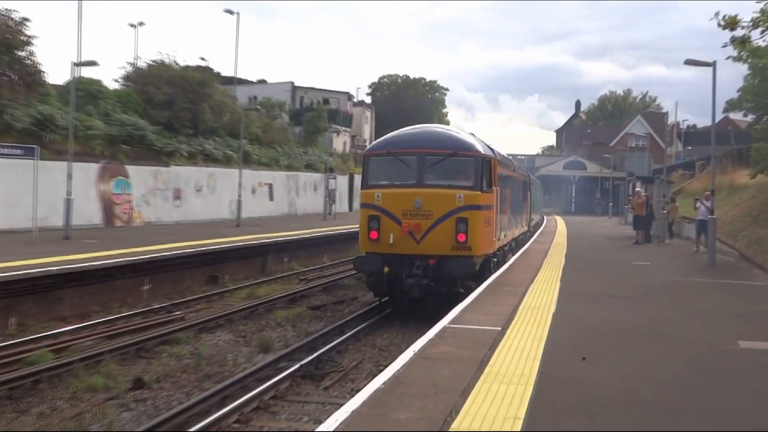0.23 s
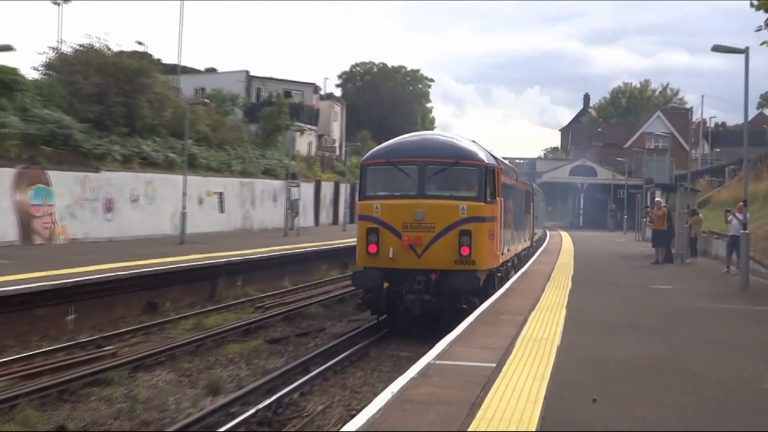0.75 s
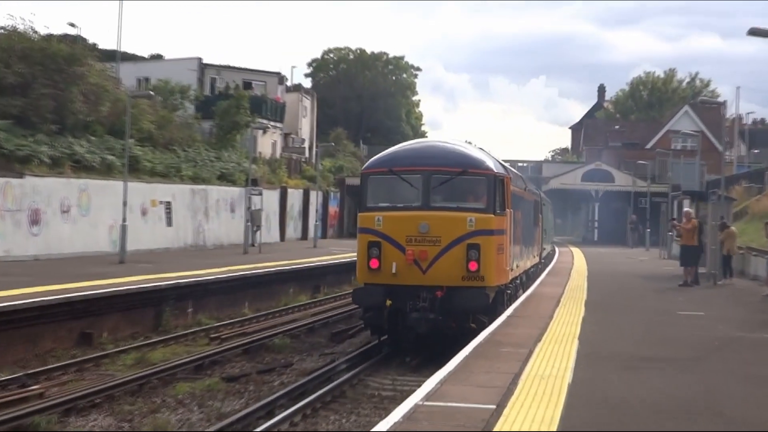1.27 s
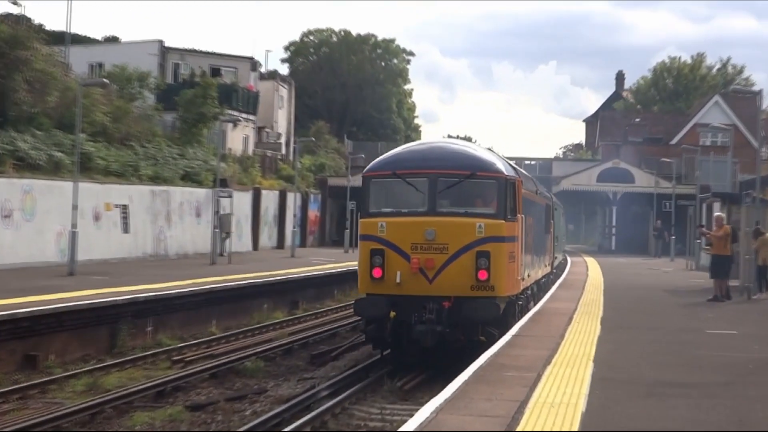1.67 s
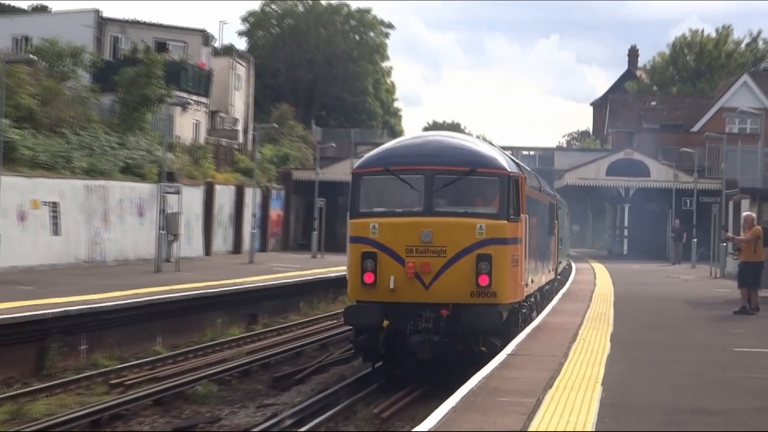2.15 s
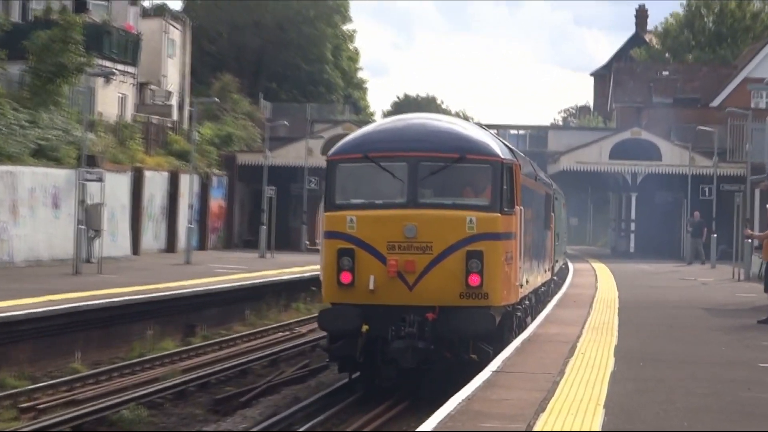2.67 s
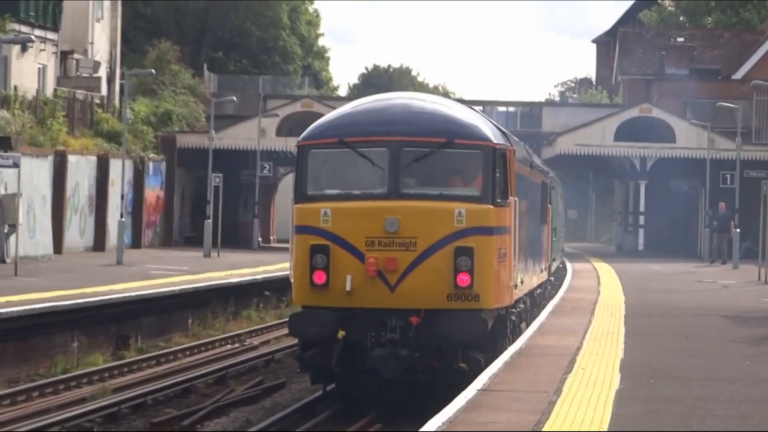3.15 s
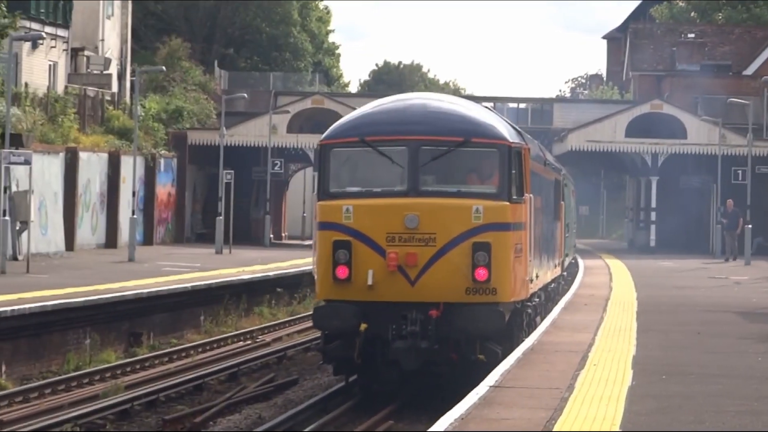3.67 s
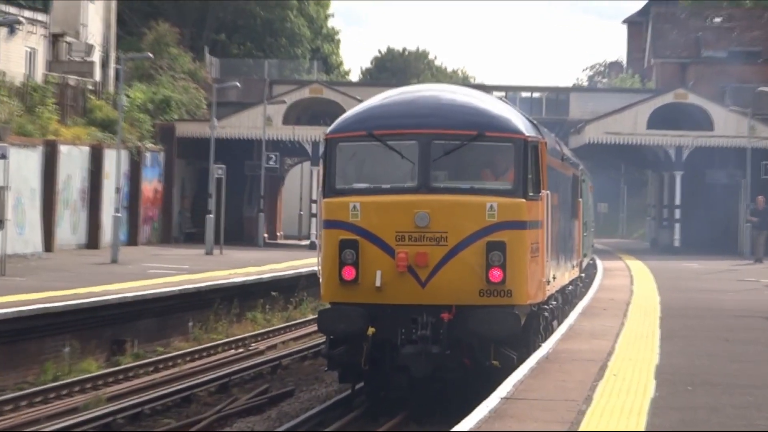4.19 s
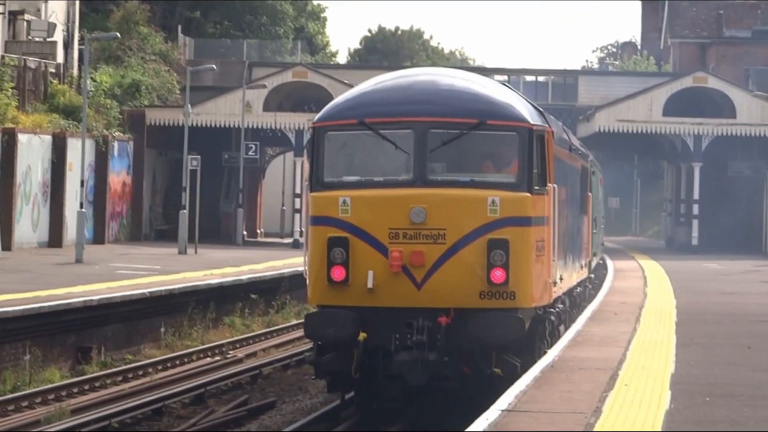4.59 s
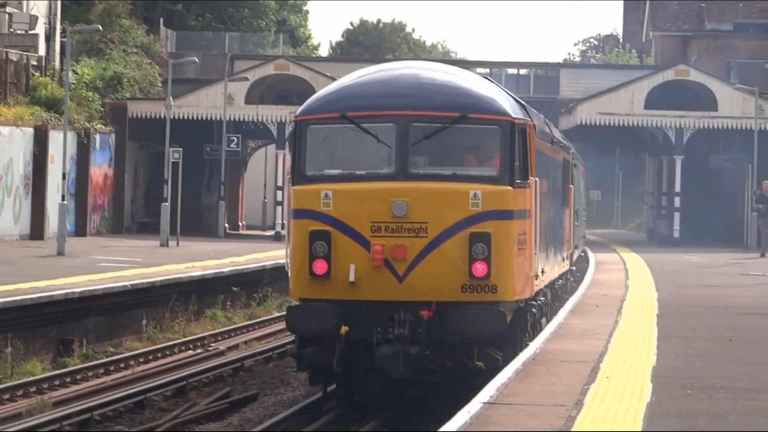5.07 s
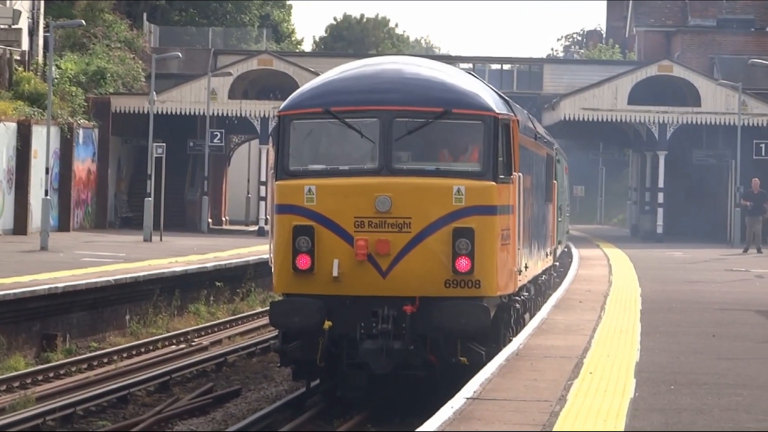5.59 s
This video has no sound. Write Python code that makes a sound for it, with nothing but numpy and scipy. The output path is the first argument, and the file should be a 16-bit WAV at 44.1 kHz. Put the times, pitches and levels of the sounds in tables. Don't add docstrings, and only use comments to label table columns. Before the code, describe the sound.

A diesel-hauled train rolls slowly away around a curved open-air platform, heard by a nearby stereo microphone. From the start a loud, piercing metallic squeal around 4.6 kHz dominates, made of several slightly detuned wheels that beat and shimmer, with brief dropouts near 0.8 and 1 s. Brake air spits at 0.3 s and hisses shut by 0.9 s. Beneath are a mid-range rail roar, growing duller with distance, ringing rail hums and a soft low rumble. From 3 to 3.8 s the squeal stutters rapidly, then collapses by 4 s. Another wheel shrieks suddenly, peaking at 4.3 s, surrounded by high whistles, wavering squeals and short chirps until about 5.2 s. The last second is calmer: dull rolling roar, creeping hum and a more noticeable distant engine throbbing about nine times per second. Small dry ticks occur close by, sharpest at 3.8 s, with later ones at 5.3 and 5.6 s.

```python
import sys
import numpy as np
from scipy import signal
from scipy.fft import rfft, irfft, next_fast_len
from scipy.io import wavfile
from scipy.ndimage import uniform_filter1d

SR = 44100
rng = np.random.default_rng(int(sys.argv[2]) if len(sys.argv) > 2 else 0)


def generate_wav(sig):
    pcm = np.round(np.clip(np.atleast_2d(sig).T, -1, 1) * 32767).astype(np.int16)
    wavfile.write(sys.argv[1], SR, pcm)


def rack_gain(trim_db):
    fader = np.asarray(trim_db, float)
    return 10 ** (fader / 20)


N = 257544
T = np.arange(N) / SR
COARSE = T[::8]


def evened(x):
    return x / np.sqrt(np.mean(abs(x) ** 2) + 1e-20)


def read(points, hz):
    f, value = np.transpose(points)
    return np.interp(np.log(hz + 1), np.log(f + 1), value, left=value[0] - 30, right=value[-1] - 30)


def curves(rows):
    s, *columns = np.transpose(rows)
    return [np.interp(T, s, c) for c in columns]


def gate(rows, fade=0.0033):
    since_start = T - rows[0][0] + 0.0012
    until_end = rows[-1][0] - T
    return np.clip(np.minimum(since_start, until_end) / fade, 0, 1)


def bursts(rows):
    pointed = 1.23
    power = 1e-12
    for s, db, rise, fall in rows:
        side = np.where(COARSE < s, abs(rise), abs(fall))
        swell_db = db - 20 * (abs(COARSE - s) / side) ** pointed
        power = power + rack_gain(2 * swell_db)
    return np.interp(T, COARSE, 10 * np.log10(power))


def ring(hz, width, steady=0.):
    r = np.exp(-np.pi * abs(width) * COARSE[1])
    slips = rng.standard_normal(len(COARSE)) + 1j * rng.standard_normal(len(COARSE))
    once = signal.lfilter([1], [1, -r], slips)
    swing = evened(signal.lfilter([1], [1, -r], once))
    swing = evened(swing / (abs(swing) + .25) ** np.clip(steady, 0, .9))
    carrier = np.exp(2j * np.pi * np.cumsum(hz * np.ones(N)) / SR)
    return np.sqrt(2) * np.interp(T, COARSE, swing) * carrier


def overtones(z, second_db, third_db):
    unit = z / (abs(z) + 1e-9)
    return (z * (1 + rack_gain(second_db) * unit + rack_gain(third_db) * unit ** 2)).real


def pan(x, db):
    return rack_gain([[db / 2], [-db / 2]]) * x


def noise(colour_db, patchy_db, flicker_db):
    frames, hz = N // 256 + 5, np.fft.rfftfreq(1024, 1 / SR)
    a, b, patches = rng.standard_normal((frames, 513, 3)).T
    patches = uniform_filter1d(patches, size=10, axis=0)
    patches = evened(uniform_filter1d(patches, size=10, axis=1))
    flicker = evened(uniform_filter1d(rng.standard_normal(frames), size=4))
    level_db = colour_db(hz[:, None], np.arange(frames) * 256 / SR)
    level_db = level_db + patchy_db * patches + flicker_db * flicker
    spectra = (a + 1j * b) * rack_gain(level_db)
    return evened(signal.istft(spectra, nperseg=1024, noverlap=768)[1][:N])


def near_axles():
    # t/s, level/dB
    grips = [(0, -21.5), (.8, -19), (1.5, -19.5), (1.9, -18), (2.5, -19), (3.1, -19.5), (3.45, -17),
             (3.76, -19.5), (3.87, -28), (3.98, -37), (4.13, -31.5), (4.26, -33.5), (4.34, -33.5),
             (4.49, -49), (4.62, -48), (4.76, -45.5)]
    # t/s, highest wheel f/Hz, drop of the receding wheels/Hz, their level/dB
    recede = [(0, 4630, 115, 6), (.7, 4645, 128, 2), (1.35, 4646, 122, 5), (1.6, 4646, 112, 0),
              (2.2, 4646, 100, 0), (2.9, 4647, 85, -1), (3.2, 4647, 72, -3), (3.7, 4648, 60, -4),
              (3.95, 4648, 50, -3), (4.1, 4648, 30, -14), (4.45, 4650, 30, -10), (4.6, 4660, 70, 6),
              (4.8, 4680, 70, 6)]
    # share of the drop, level/dB, width/Hz
    wheels = [(.45, -1, 16.2), (0.98, -3, 15.6), (0.7, -6, 28), (-0.3, -8.5, 51), (.5, -3, 137)]
    # t/s, depth/dB, half length/s
    let_go = [(0.172, 11, 0.0057), (0.49, 4, 0.043), (0.834, 20, 0.005), (0.914, 1, 0.0065),
              (0.968, 16.5, 0.0082), (1.768, 5, 0.012), (2.295, 9, 0.0053), (2.404, 7, 0.012),
              (2.71, 4.5, 0.04), (2.992, 10, 0.02), (3.054, 10, 0.004), (3.092, 3, 0.0052),
              (3.13, 0, 0.0032), (3.169, 8.5, 0.016), (3.195, 14, 0.0098), (3.267, 13.5, 0.023),
              (3.316, 4.5, 0.017), (3.375, 7.5, 0.034), (3.415, 12.5, 0.0057), (3.448, 9.5, 0.0068),
              (3.485, 6, 0.027), (3.526, 10, 0.013), (3.574, 7, .007), (3.636, 5, 0.059),
              (3.696, 6, 0.0065), (3.731, 6, 0.015), (3.78, 6.5, 0.014), (3.826, 7, 0.025),
              (4.07, 13, 0.025), (4.304, 16, 0.041)]
    multiples = (-59, -40)
    buzz_hz = [3080, 3750, 6030, 6960, 7750, 9200, 11600, 14900, 4570]
    # width/Hz, level/dB, fading with distance/(dB/s)
    buzz_modes = [(40, -30.5, 2), (162, -25.5, 2), (160, -21.5, 3), (170, -29, 0.5), (362, -21, 4.5),
                  (275, -23.5, 0.5), (400, -38, 3), (500, -51.5, 4), (417, -4.5, 8)]

    top_hz, drop_hz, behind_db = curves(recede)
    slip_db = sum(db * np.exp(-2 * ((COARSE - s) / half) ** 2) for s, db, half in let_go)
    grip_db = curves(grips)[0] - np.interp(T, COARSE, slip_db)
    slow_db = uniform_filter1d(grip_db, size=SR // 4)
    bend_db = np.minimum(slow_db + 16, 0)

    top = ring(top_hz, 6.4, 1.0)
    behind = sum(rack_gain(db) * ring(top_hz - share * drop_hz, width, 0.28) for share, db, width in wheels)
    z = (top + rack_gain(behind_db) * behind) / np.sqrt(1 + 3.2 * rack_gain(2 * behind_db))
    z /= (abs(z) + .2) ** .3
    squeal = overtones(z, *(db + bend_db for db in multiples))

    buzz = np.zeros(N)
    for hz, (width, db, fade_db) in zip(buzz_hz, buzz_modes):
        buzz += rack_gain(db - fade_db * T) * ring(hz, width).real
    rough = 1 + .7 * ring(0, 150) / np.sqrt(2)
    cubed = (top / (abs(top) + .3)) ** 3
    third = rack_gain(-30.5 + 1.6 * bend_db) * (cubed * rough).real
    return gate(grips) * (rack_gain(grip_db + 4.5) * squeal + rack_gain(slow_db) * (buzz + third))


def far_wheels():
    # peak t/s, level/dB, rise/s, fall/s (both over 20 dB)
    loud_grips = [
        [(4.08, -36.5, .05, .1), (4.18, -20, 0.082, 0.1), (4.235, -23, .06, 0.029), (4.3, -13.5, 0.033, 0.022),
         (4.35, -19, 0.03, 0.16), (4.7, -32.5, 0.74, 0.027), (4.82, -40, 0.076, .07), (4.9, -50, .1, 0.35)],
        [(2.51, -39.5, 0.2, 0.11), (2.94, -41.5, 0.55, 0.28), (3.2, -38, 0.086, 0.49), (3.46, -26, 0.01, 0.02),
         (3.58, -36, 0.083, 0.029), (3.8, -37.5, 0.89, 1), (4.5, -31, 0.26, 0.49), (4.74, -26, 0.057, 0.029),
         (4.86, -29, 0.066, 0.1), (5.06, -36.5, 0.23, 0.11)],
        [(2.95, -65, 0.22, 0.37), (3.45, -39, 0.34, 0.99), (3.85, -32, 0.28, 0.53), (4.15, -27.5, 0.053, 0.04),
         (4.35, -32, 0.72, 0.13), (4.46, -34.5, 0.12, 0.3), (4.68, -35, 0.17, 0.28), (4.86, -50, 0.22, 0.096)],
        [(4.108, -37, 0.058, 0.051), (4.3, -33.5, 0.2, 0.016), (4.362, -29.5, 0.075, 0.07),
         (4.47, -37, .08, 0.14), (4.54, -40, .08, .03)],
    ]
    faint_grips = [
        [(3.33, -46, .08, .3), (3.53, -45, 0.26, 0.36), (3.7, -39, 0.068, 0.34), (3.866, -35.5, 0.33, 0.13),
         (4.05, -49.5, .2, 0.34), (4.316, -47.5, 0.47, 0.24), (4.472, -37, 0.013, 0.39),
         (4.57, -29.5, 0.064, 0.037), (4.65, -45, .1, .1), (4.73, -38.5, 0.1, 0.088),
         (4.86, -38.5, 0.24, 0.052)],
        [(4.69, -44.5, .2, 0.45), (4.86, -46, .4, 0.033), (5.09, -35.5, 0.057, 0.03), (5.174, -36, .07, 0.045),
         (5.258, -49.5, 0.11, 0.11)],
        [(3.8, -44, 0.27, 0.32), (4.4, -48, 0.68, 0.81), (5.22, -56, .1, 0.4), (5.6, -49, 0.34, 0.27),
         (5.84, -45, 0.26, 1.1)],
        [(3.81, -56, 0.04, 1.4), (4.34, -47.5, 0.089, 0.13), (4.67, -44.5, 0.23, 0.19),
         (5.1, -63.5, 0.34, 0.46), (5.57, -65.5, 0.6, 0.2), (5.8, -65.5, .2, .5)],
        [(4.42, -46.5, .3, 0.31), (4.7, -60, .3, 0.23)],
        [(4.822, -36, 0.06, 0.12), (4.93, -34, 0.017, 0.031)],
        [(5.15, -65.5, .2, 0.28), (5.5, -69, 0.27, 0.28), (5.8, -68, 0.27, .5)],
        [(4.13, -64, .08, .2), (4.3, -57, .2, .2), (4.52, -59, .07, .12)],
    ]
    squeal_hz = [4924, 6372, 10472, 5528, 3170, 5193, 4362, 8100, 9262, 872, 7400, 14800]
    # width/Hz, steadiness 0-1, 2nd multiple/dB, 3rd multiple/dB
    characters = [(15, 0.85, -26.5, -41.5), (20, 0.4, -34, -84), (18, 0.1, -86, -91), (22, 0.3, -56, -80),
                  (85, 0.11, -41, -16.5), (12, 1, -80, -80), (14, 0.8, -81, -94), (20, 0.4, -82, -78),
                  (25, 0.3, -80, -89), (8.1, 1, -80, -80), (25, .4, -80, -80), (350, .1, -80, -80)]
    twins = {1: (62, 26, 0.94, 32), 2: (87, 44, 1, 11.5)}
    # t/s,
    # length/s, f/Hz, level/dB
    catches = [(2.558, .042, 3880, -47), (2.71, .05, 5900, -42), (2.734, .1, 3770, -41),
               (2.743, .11, 5150, -41), (3.53, .08, 3255, -43), (4.2, .25, 15390, -63),
               (4.23, .09, 4780, -41), (4.27, .07, 5080, -41), (4.6, .08, 4640, -46),
               (4.667, .03, 5800, -47), (4.7, .04, 5400, -47), (4.75, .06, 5470, -41),
               (4.77, .11, 6280, -33), (4.8, .22, 9920, -53), (4.865, .06, 4705, -41),
               (4.94, .04, 4820, -41), (4.95, .03, 5500, -48), (5.0, .04, 4900, -49),
               (5.4, .022, 9750, -53)]

    out = np.zeros(N)
    for k, (rows, hz, character) in enumerate(zip(loud_grips + faint_grips, squeal_hz, characters)):
        width, steady, second_db, third_db = character
        level_db = uniform_filter1d(bursts(rows), size=600)
        skirt_db = uniform_filter1d(level_db, size=5000) - level_db - 8.5
        skirt = rack_gain(skirt_db) * ring(hz, 8 * width)
        z = ring(hz, width, steady)
        if k in twins:
            low_hz, closing, db, twin_width = twins[k]
            twin_hz = hz - np.maximum(low_hz - closing * (T - 3), 0)
            z = (z + rack_gain(db) * ring(twin_hz, twin_width, steady)) / np.sqrt(2)
        bend_db = .6 * np.minimum(level_db + 33, 0)
        out += rack_gain(level_db) * overtones(z + skirt, second_db + bend_db, third_db)

    wobble = ring(0, 35, 0.16)
    for s, length, hz, db in catches:
        at = slice(round((s - length / 3) * SR), round((s + length * 4 / 3) * SR))
        tone = (wobble[at] * np.exp(2j * np.pi * hz * T[at])).real
        out[at] += rack_gain(db) * np.hanning(len(T[at])) * tone
    return out


def rolling():
    # t/s, level/dB
    roll = [(0, -25.5), (.44, -23.5), (.83, -25), (1.2, -24.5), (1.6, -28.5), (1.74, -25.5), (2.08, -29),
            (2.62, -30.5), (3.76, -31.5), (4.06, -31.5), (4.28, -30.5), (4.38, -33.5), (4.55, -29.5),
            (4.7, -31.5), (4.91, -27.5), (5.07, -29), (5.84, -27)]
    # f/Hz, level/dB per Hz
    near_colour = [(470, -50.5), (800, -18), (989, -18.5), (1030, -10), (1190, -15), (1660, 0.5), (1840, 3),
                   (2360, -0.5), (2480, -2.5), (2620, -11), (2870, -23), (3120, -15.5), (3400, -26),
                   (4420, -62), (7480, -120)]
    # f/Hz, level/dB per Hz
    far_colour = [(470, -2.5), (800, -23.5), (989, -6.5), (1070, -10.5), (1170, -14), (1530, 2),
                  (1650, -1.5), (2000, 2.5), (2240, -5), (2480, -9.5), (2530, -14.5), (2750, -18.5),
                  (3400, -19.5), (4420, -28), (7480, -120)]
    # f/Hz, level/dB per Hz
    wash_colour = [(2300, -18), (2800, 2.5), (4000, 11), (5500, 12), (6400, 6), (6750, -12), (7200, 4.5),
                   (9500, 1.5), (10100, -25), (10800, -32), (12300, -18), (13600, -18), (15000, -22),
                   (15800, -30)]
    hum_hz = [1056, 1574, 1772, 2396, 351, 646, 466]
    # width/Hz, level under the roar/dB
    hum_tones = [(14.2, -23.5), (9.9, -16), (11.6, -19.5), (13.8, -21.5), (13, -31.5), (13, -34.5),
                 (22, -30)]

    def roar_colour(hz, s):
        far = np.clip((s - 2.2) / 2.06, 0, 1)
        near_db = read(near_colour, hz)
        return near_db + far * (read(far_colour, hz) - near_db)

    roar = noise(roar_colour, 0.82, 1.0)
    creep = 1 + .008 * np.maximum(T - 4.6, 0)
    hum = np.zeros(N)
    for k, (hz, (width, db)) in enumerate(zip(hum_hz, hum_tones)):
        pitch = hz * creep if k == 0 else hz
        hum += rack_gain(db + 3) * ring(pitch, width, 0.39).real
    wash = noise(lambda hz, s: read(wash_colour, hz), 2.2, 0.93)
    hum_db = -7 + 3 * np.minimum(T, 3.54)
    wash_db = -7 - 2.5 * T
    return rack_gain(curves(roll)[0]) * (roar + rack_gain(hum_db) * hum + rack_gain(wash_db) * wash)


def engine():
    # t/s, body level/dB
    body_level = [(0, -38), (.41, -39.5), (1.41, -42), (2.1, -44.5), (2.8, -42), (3.67, -37.5), (4.02, -37.5),
                  (4.5, -37.5), (5.0, -33.5), (5.56, -34), (5.84, -32)]
    # f/Hz, level/dB per Hz
    body_colour = [(120, -61), (200, -16), (366, -2), (411, -4.5), (470, -4), (637, 3.5), (781, -3),
                   (988, -10.5), (1070, -7.5), (1300, -6.5), (1690, -34), (2860, -120)]
    # f/Hz, level/dB per Hz
    rumble_colour = [(22, -15), (40, -17), (52, -19), (90, -9), (130, -10.5), (200, -5), (260, -9),
                     (500, -40), (900, -70.5)]

    body_db = curves(body_level)[0]
    rumble_db = -50 + (body_db + 40) - 1.5 * T
    throb_db = -61.5 + 1.3 * (body_db + 39)
    firing_hz = 9.1
    turns = firing_hz * T + .32 + 0.066 * ring(0, 1.2).real
    beat = np.exp(0.18 * np.cos(2 * np.pi * turns))
    body = noise(lambda hz, s: read(body_colour, hz), 0.69, 0.96) * beat ** 0.16
    rumble = noise(lambda hz, s: read(rumble_colour, hz), 0.85, .4)
    throb = evened(beat ** 2.5 * ring(69, 6.2, 0.66).real)
    return rack_gain(body_db) * body + rack_gain(rumble_db) * rumble + rack_gain(throb_db) * throb


def air_valve():
    # peak t/s, level/dB, rise/s, fall/s (both over 20 dB)
    spits = [
        (.27, -38.5, 0.013, 0.38),
        (.322, -38, 0.06, .05),
        (.4, -46.5, .2, .3),
        (.5, -44.5, .3, 0.023),
        (.7, -51.5, 0.76, 0.46),
        (.87, -43.5, 0.12, .12),
        (.12, -62, .1, .3),
    ]
    # f/Hz, level/dB per Hz
    hiss_colour = [(1500, -20), (4000, 11.5), (5500, 16), (6700, 8), (8000, 19.5), (9600, 12), (10300, 3.5),
                   (12000, 4), (15000, 6), (16000, -18)]

    sputter = rack_gain(1.8 * evened(uniform_filter1d(rng.standard_normal(N), size=150)))
    shutting = np.clip((0.92 - T) / 0.044, 0, 1)
    hiss = noise(lambda hz, s: read(hiss_colour, hz), 1.3, 0.61)
    return rack_gain(bursts(spits) + 9.5) * shutting * sputter * hiss


def ticks():
    # t/s, peak level/dB, f/Hz, left-right/dB
    knocks = [
        (3.235, -38, 7560, -2),
        (3.497, -34, 4270, -4),
        (3.8238, -14, 7100, 0),
        (3.823, -20, 4040, -18.5),
        (3.98, -31, 3800, -2),
        (4.31, -32, 3800, -18),
        (5.3, -32, 8000, -10),
        (5.565, -26, 6000, -3),
    ]
    out, t = np.zeros((2, N)), T[:400]
    for s, db, hz, pan_db in knocks:
        burst = np.exp(-((t * hz - 2.2) / 1.1) ** 2) * np.sin(2 * np.pi * hz * t)
        dull = np.convolve(rng.standard_normal(len(t)), np.hanning(9) / 4, "same")
        puff = rack_gain(-6.0 - 60 * t / .012) * dull
        start = round(s * SR)
        out[:, start:start + len(t)] += pan(rack_gain(db) * (burst + puff), pan_db)
    return out


def still_air():
    return rack_gain(-66.5) * noise(lambda hz, s: -6 * np.maximum(hz - 12500, 0) / 2500, .8, .5)


def ports(x):
    # f/Hz, likeness 0-1, left lag/rad, left-right/dB
    differences = [(150, 1, -.03, 0), (400, .99, -.2, -1), (650, .975, -.26, -1.2), (900, .975, -.3, -1.3),
                   (1650, 1, 0, 0), (2400, .98, .5, -.7), (3150, .88, .88, -1), (3700, .86, -.05, 3.5),
                   (4500, .985, -.55, 2.2), (5600, .99, -.03, 0), (6400, .8, .46, -2), (7500, .93, 0, -1),
                   (8500, .6, .3, -7), (9300, .92, -.35, -2), (10450, .55, .3, -.5), (11300, 1, 0, 0)]
    size = next_fast_len(N + SR // 2)
    hz = np.fft.rfftfreq(size, 1 / SR)
    port_hz, *columns = np.transpose(differences)
    like, lag, lean_db = (np.interp(hz, port_hz, c) for c in columns)
    taps = rfft(rng.standard_normal(5000) * rack_gain(-60 * T[:5000] / 0.26), size)
    direct = rfft(x, size)
    scatter = direct * taps / abs(taps)
    apart = np.arccos(np.clip(like, 0, 1)) / 2
    tilt = rack_gain(lean_db / 2) * np.exp(-.5j * lag)
    left = (np.cos(apart) * direct + np.sin(apart) * scatter) * tilt
    right = (np.cos(apart) * direct - np.sin(apart) * scatter) / tilt
    return irfft([left, right], size)[:, :N]


def mute_faint(x):
    hz, s, z = signal.stft(x, SR, nperseg=2048, noverlap=1536)
    z = np.where(hz[:, None] > 10700, z.mean(0), z)
    middle = abs(z[:, :1024].mean(0)) ** 2
    power = middle.reshape(64, 16, -1).mean(1) * 2048 / 1.5
    waver = evened(uniform_filter1d(rng.standard_normal(power.shape), size=4, axis=1))
    mask_db = np.where(s < 4.94, -55.5, -67.5) + 2.2 * waver
    loud = uniform_filter1d(power, size=3, axis=1) > rack_gain(2 * mask_db)
    keep = np.repeat(loud, 16, axis=0) | (hz[:1024, None] < 9950)
    z = z * np.vstack([keep, keep[-1:]])
    return signal.istft(z, SR, nperseg=2048, noverlap=1536)[1][:, :N]


def scene():
    train = near_axles() + far_wheels() + rolling() + engine() + air_valve()
    return ports(train + still_air()) + ticks()


def band_limit(x):
    return signal.sosfilt(signal.butter(12, 15750, fs=SR, output="sos"), x)


def record(dry):
    limited = 0.95 * np.tanh(dry / 1.015)
    return band_limit(mute_faint(limited))


dry = scene()
out = record(dry)
generate_wav(out)
```